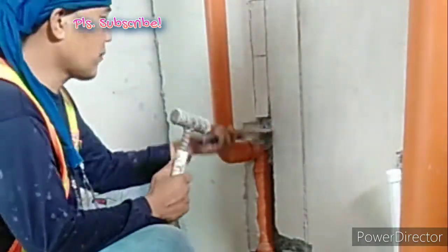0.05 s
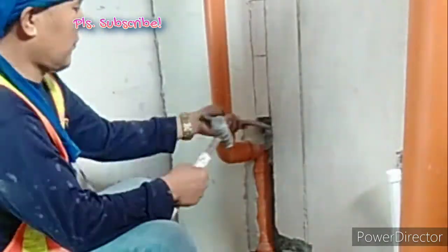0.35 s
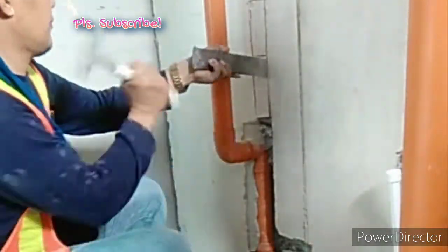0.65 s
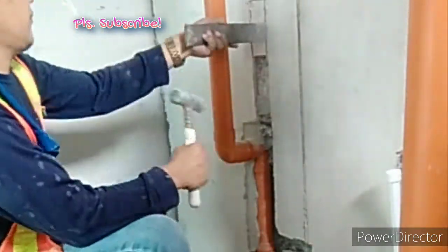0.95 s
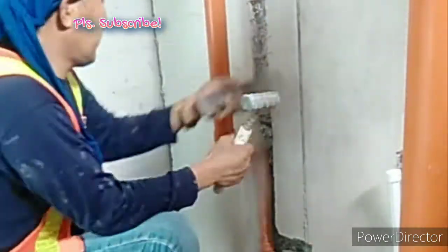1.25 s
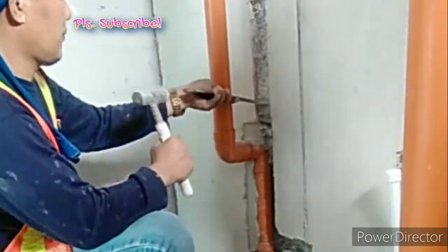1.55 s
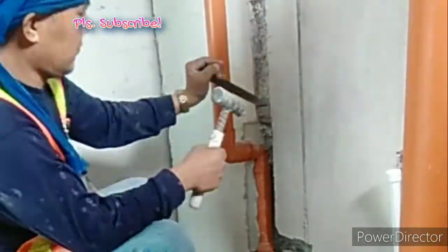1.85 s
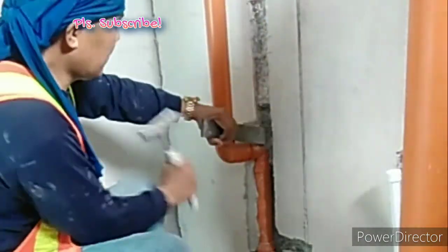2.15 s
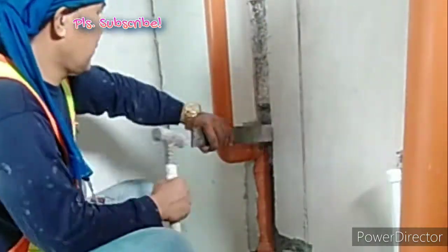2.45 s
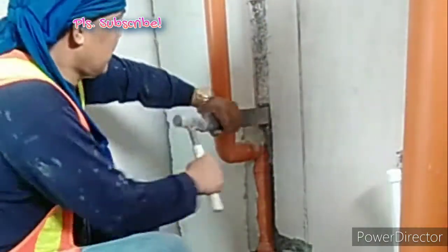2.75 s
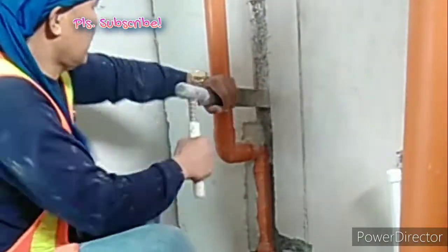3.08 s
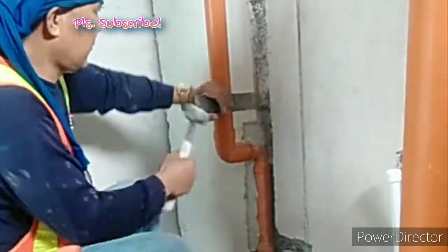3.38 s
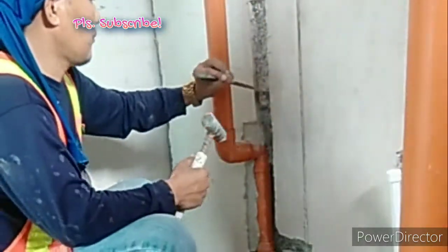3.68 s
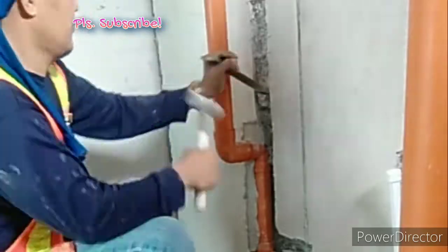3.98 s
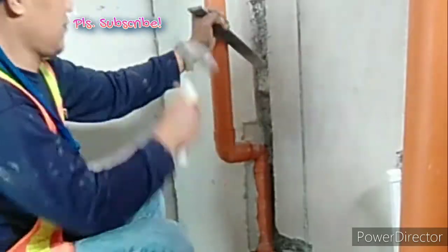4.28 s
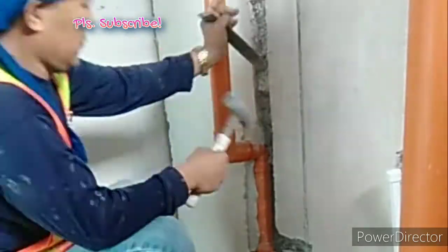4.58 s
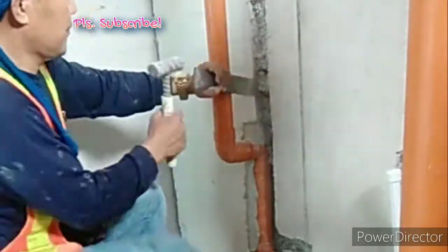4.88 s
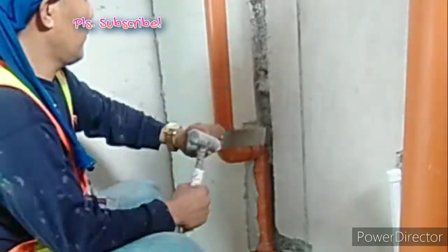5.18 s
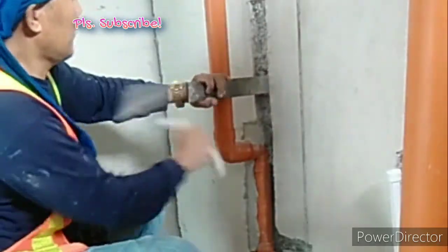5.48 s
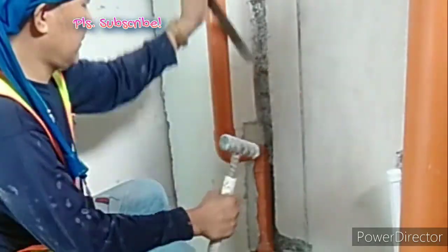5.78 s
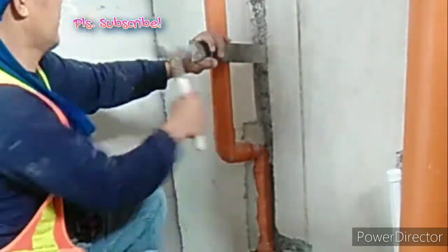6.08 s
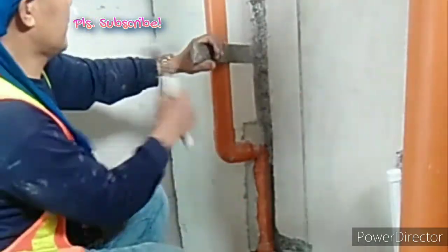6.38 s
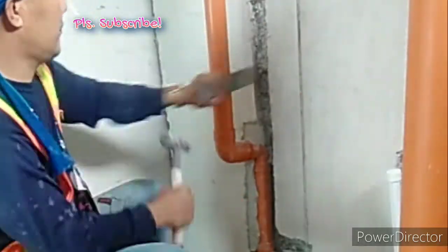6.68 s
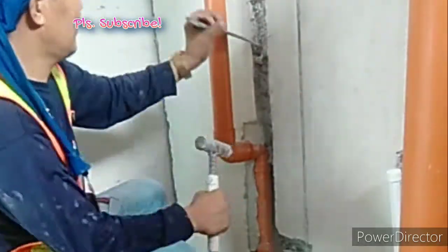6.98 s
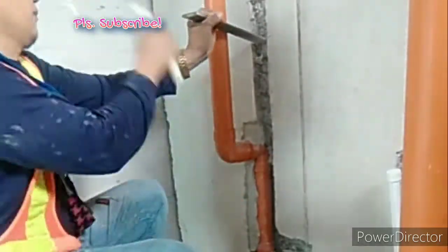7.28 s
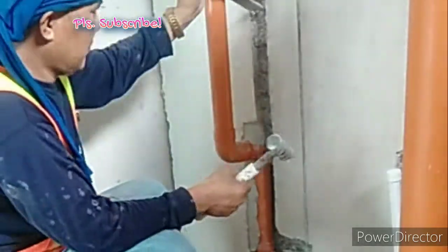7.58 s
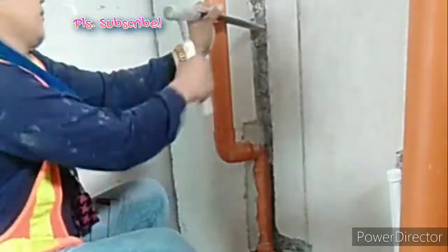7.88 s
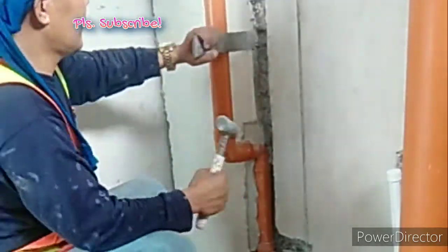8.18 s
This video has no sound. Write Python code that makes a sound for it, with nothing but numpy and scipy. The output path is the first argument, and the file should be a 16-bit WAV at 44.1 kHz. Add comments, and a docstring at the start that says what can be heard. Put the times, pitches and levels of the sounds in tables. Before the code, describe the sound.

A hammer drives a flat steel chisel into a concrete wall in quick bursts of two to six blows, each a hard crack with a short metallic ring. Between bursts the blade knocks and scrapes in the groove, chips tick down and sand trickles. Near the end the scraping increases and the edge squeaks faintly. The microphone is close, in a small bare room.

```python
"""A small bare room, heard from one close microphone: a hammer drives a flat steel chisel into concrete.
The blows come in bursts of two to six, each a hard crack, a ring of chisel and room, and a clatter.
Between bursts come blade knocks and short rasps: scrapes, crumbling concrete, a sleeve's rustle.
Chips tick, sliding blade and trickling sand hiss, and late on the edge squeaks, over faint room tone.
A noise suppressor dries the tails, and the loudest peaks are softly rounded."""
import sys
import numpy as np
from scipy import signal
from scipy.fft import rfft, irfft, next_fast_len
from scipy.io import wavfile
from scipy.ndimage import uniform_filter1d

SR = 44100
rng = np.random.default_rng(int(sys.argv[2]) if len(sys.argv) > 2 else 0)


def store_pcm(level_fs):
    """Save levels as 16-bit WAV."""
    pcm = np.round(np.clip(level_fs, -1, 1) * 32767).astype(np.int16)
    wavfile.write(sys.argv[1], SR, np.atleast_2d(pcm).T)


N = 367786
TIME = np.arange(N) / SR
SINCE_HIT = np.arange(SR // 2) / SR

# the building's steady rush: (frequency [Hz], level [dB])
ROOM_TONE_EQ = [(30, -17.5), (120, -7.5), (250, -32), (460, 9.5), (700, -11.5), (1100, 3.5), (2000, -4.5),
                (4000, -8), (8000, -18), (15500, -28)]
# how long the room holds each pitch: (frequency [Hz], base t60 [s])
ROOM_DECAY = [(100, 0.44), (500, 0.78), (1000, 0.29), (2500, 0.22), (5000, 0.19), (9000, 0.17),
              (15000, 0.2)]
# gritty hiss of sliding blade and trickling sand: (start [s], length [s], relative level [dB])
HISSES = [(0, 0.039, -43), (.82, 0.096, -37.5), (1.22, 0.47, -42.5), (1.8, 0.11, -30.5), (1.98, 0.3, -41.5),
          (2.22, 0.35, -36.5), (4.07, 0.072, -29.5), (5.7, 0.097, -29.5), (7.64, 0.051, -36),
          (8.05, 0.1, -28), (8.16, 0.14, -36.5)]
# the blade knocks in the groove: (time [s], strength [dB], knock boost [dB], crunch boost [dB])
KNOCKS = [(0.016, -40, 8, 5), (0.058, -39.5, 10.5, 11), (0.124, -41, 16, 10.5), (0.541, -32, -4.5, -2.5),
          (0.944, -40, 6, -14.5), (1.271, -31.5, 18.5, 20), (1.494, -43, 19.5, 14.5),
          (1.547, -40.5, 7.5, 9.5), (1.571, -36, 10, 5), (1.639, -42.5, 5.5, 8), (1.957, -38.5, 9, 21),
          (2.107, -31.5, 12.5, 21.5), (2.145, -32.5, 12, 14), (2.53, -32.5, 3.5, 8), (2.542, -32.5, 4, 9),
          (2.73, -34, 15.5, 0), (2.923, -33.5, -1.5, 5.5), (3.243, -20, -1, 9.5), (3.654, -40, 10.5, -13.5),
          (4.218, -25.5, 0.5, -6.5), (4.263, -34, 0, -9), (4.288, -42, 10, -27), (4.312, -42, -0.5, -16.5),
          (4.351, -34.5, 3, 7), (4.378, -46, 14.5, 10.5), (4.894, -40.5, -5, 6), (4.953, -42, 1.5, -3.5),
          (4.991, -26.5, -6, 19.5), (5.759, -30, 11.5, 25), (5.86, -37, 8, 13.5), (6.356, -36.5, 5, -14),
          (7.073, -26.5, 2.5, 12.5), (7.133, -25.5, 0, 6), (7.164, -30, -3, -23), (7.577, -33, -7, 0),
          (7.657, -29.5, -13, -15), (7.69, -33, 7, 8.5), (7.743, -39.5, 13.5, 8.5),
          (7.775, -28.5, -16.5, -24.5), (8.2137, -18, -6.5, 9.5)]
# ringing resonances of chisel and room together: (frequency [Hz], level [dB], base t60 [s])
RESONANCES = [(210, -24, .35), (347, -26, .3), (557, -12.5, .48), (589, -8.5, .44), (691, -16, .25),
              (818, -2.5, .23), (896, -12, .22), (1049, -12, .27), (1170, -9, .27), (1254, -10, .2),
              (1495, -7, .2), (1536, 3.5, .19), (1565, 2, .17), (1604, -3, .22), (1741, -10, .24),
              (1894, -7, .24), (1972, -6, .25), (2096, -10, .24), (2250, -5, .27), (2349, -4, .27),
              (2497, -1, .24), (2543, 1, .24), (2629, -11, .25), (2842, -8, .24), (3048, -6, .23),
              (3251, -9, .23), (4190, -15, .22), (5420, -9, .15), (9130, -21, .16), (11550, -21, .15)]
# dense clatter of steel on concrete: (frequency [Hz], level [dB])
CLATTER_EQ = [(30, -16.5), (60, -22.5), (150, -25.5), (210, -17.5), (300, -16), (480, -13.5), (700, -9.5),
              (1050, 3.5), (2300, 5.5), (3400, 3.5), (4500, -2), (7000, -8.5), (11500, -13.5),
              (15500, -19.5)]
# hammer blows, band by band: (time [s], knock [dB], clang [dB], ring [dB], bite [dB], crunch [dB])
BLOWS = [(0.2616, -28.5, -33.5, -28.5, -34.5, -29.5), (0.3101, -24.5, -29.5, -27, -31.5, -25),
         (0.3581, -26, -22, -26, -29, -26.5), (0.695, -24.5, -25.5, -20, -29.5, -33.5),
         (0.7408, -31.5, -26.5, -17.5, -28.5, -33), (0.78, -30, -29, -18, -27.5, -34),
         (1.087, -26.5, -20.5, -19.5, -31, -36), (1.1332, -32, -24, -18.5, -31.5, -35),
         (1.1724, -28, -27, -20.5, -26, -33.5), (1.6821, -28.5, -24, -25.5, -34, -28.5),
         (1.738, -29, -21.5, -21.5, -31.5, -28), (1.7909, -28.5, -20.5, -24, -29.5, -28),
         (1.8426, -27, -19.5, -27.5, -27, -28), (2.1991, -29.5, -22.5, -25.5, -26.5, -29.5),
         (2.2321, -28, -20, -28, -25.5, -26.5), (2.3735, -24.5, -29.5, -27.5, -33, -35.5),
         (2.41, -29.5, -22, -24, -25.5, -30), (2.586, -28, -25, -23.5, -32.5, -30.5),
         (2.624, -27.5, -23, -23, -27.5, -31), (2.7846, -27, -24.5, -25.5, -33.5, -36),
         (2.8176, -29.5, -23, -21.5, -28, -30), (3.0265, -30.5, -22, -20, -30, -31),
         (3.066, -22.5, -25, -25.5, -27, -28.5), (3.1043, -29.5, -23.5, -25, -27.5, -30),
         (3.1367, -24.5, -30, -24, -25.5, -28.5), (3.3547, -27.5, -20.5, -23.5, -32.5, -31),
         (3.3982, -24, -28.5, -19.5, -25, -29.5), (3.4353, -27.5, -25, -19, -26, -31),
         (3.8413, -26, -21.5, -22, -31.5, -32), (3.8996, -30.5, -21.5, -20, -31.5, -29),
         (3.957, -23.5, -24, -23.5, -33, -28), (4.0121, -30.5, -21.5, -19, -30.5, -27),
         (4.4142, -30, -20, -24.5, -29.5, -30), (4.484, -29.5, -22, -19, -30, -27),
         (4.546, -27.5, -24.5, -17.5, -29, -30.5), (4.603, -25, -26.5, -25.5, -24, -25),
         (5.053, -30.5, -22.5, -21, -34.5, -32.5), (5.101, -30.5, -21, -19, -28, -32.5),
         (5.1433, -30, -26, -19, -28.5, -32.5), (5.4779, -24, -41, -22.5, -34, -30.5),
         (5.519, -27.5, -18.5, -24.5, -29.5, -32), (5.5606, -28.5, -20, -23.5, -30, -31.5),
         (5.6027, -29, -26, -19, -30.5, -29), (5.6429, -29, -25.5, -17.5, -28, -33.5),
         (5.6809, -26, -25, -21.5, -24.5, -30), (6.061, -26, -21.5, -22, -29, -29),
         (6.1077, -28.5, -23, -18, -28.5, -29), (6.149, -27.5, -24, -20, -24, -30),
         (6.1872, -25.5, -25, -17.5, -27, -31), (6.3959, -24.5, -31, -19, -29.5, -31),
         (6.4435, -33.5, -22.5, -19, -29, -30.5), (6.4843, -26, -28.5, -19, -27, -30.5),
         (6.6662, -28.5, -21, -22.5, -30.5, -30.5), (6.7099, -27.5, -19, -22, -28, -31.5),
         (6.8948, -26, -21.5, -23, -30, -32.5), (6.9367, -30, -22.5, -19.5, -30.5, -32.5),
         (7.2782, -36.5, -27, -20.5, -32, -31.5), (7.3393, -29, -24.5, -19.5, -30, -28.5),
         (7.392, -31, -22, -19, -29, -28.5), (7.888, -29, -19.5, -22, -31, -29),
         (7.9534, -28.5, -18, -22, -28.5, -30), (8.0151, -29, -25, -17.5, -27, -27.5)]
# edges of those five bands, from knock up to crunch: (frequency [Hz])
BAND_EDGES = [700, 1380, 1730, 3250, 6750, 15000]
# the crack of steel on steel: (frequency [Hz], level [dB])
CRACK_EQ = [(100, -27), (1000, -23), (2500, 1.5), (5500, 7.5), (7500, 4), (10500, 6.5), (15500, 1)]
# chips of concrete land: (time [s], level [dB])
CHIPS = [(0.478, -40.5), (0.9022, -36), (1.0093, -36.5), (1.328, -35), (1.401, -42.5), (1.447, -47),
         (1.622, -48), (2.021, -39.5), (2.075, -39), (4.269, -49), (4.729, -45.5), (4.785, -46.5),
         (4.822, -47), (7.0285, -45), (7.54, -39.5), (7.564, -36)]
# the tick of a landing chip: (frequency [Hz], level [dB])
CHIP_EQ = [(100, -18.5), (600, -2.5), (1500, 6.5), (4000, 4), (7000, 5.5), (10500, 3), (15500, -8.5)]
# blade scrapes, crumbling concrete and a sleeve's rustle: (start [s], length [s], level [dB])
RASPS = [(.86, 0.04, -39), (2.15, 0.031, -47), (2.755, 0.04, -46.5), (4.115, 0.023, -31),
         (5.455, 0.014, -40.5), (6.56, 0.096, -38), (6.73, 0.127, -34.5), (6.865, 0.143, -34.5),
         (7.05, 0.14, -36), (7.48, 0.036, -47), (7.65, 0.14, -35.5), (7.81, 0.039, -37.5),
         (8.08, 0.089, -36.5), (8.24, 0.12, -34.5)]
# the edge skids: (start [s], length [s], pitch [Hz], level [dB], jitter [share of pitch])
SQUEAKS = [(7.632, .1, 6650, -47, 0.0084), (8.057, 0.27, 3900, -45.5, 0.038),
           (8.127, 0.206, 6360, -48.5, 0.04)]
# the colours of the hiss and the rasps: (frequency [Hz], level [dB])
HISS_EQ = [(1000, -9.5), (2500, 6.5), (4000, 1), (7000, 1), (10000, 1.5), (15000, -3)]
RASP_EQ = [(200, -15), (600, -6), (1050, 11.5), (1550, 4.5), (2400, 4), (3100, -4.5), (4200, -1.5),
           (12000, -36)]


def amp(db):
    """Decibels to gain."""
    return 10 ** (np.asarray(db) / 20)


def curve_at(points, hz):
    """Reads a (frequency [Hz], value) curve on a log-frequency axis."""
    freqs, values = np.transpose(points)
    return np.interp(np.log(hz + 1), np.log(freqs + 1), values)


def unit_rms(x, size=None):
    """Scales to rms 1 over the first size samples."""
    return x / np.sqrt(np.mean(x[:size] ** 2) + 1e-20)


def decay(t, t60):
    """An envelope that falls 60 dB in t60 seconds."""
    return np.exp(-np.log(1000) * t / t60)


def place(mix, start, sound):
    """Lays a sound into the mix at start seconds."""
    part = mix[max(round(start * SR), 0):][:len(sound)]
    part += sound[:len(part)]


def eq(x, curve):
    """Minimum-phase EQ along a (frequency [Hz], level [dB]) curve: no ringing ahead of a hit."""
    size = next_fast_len(len(x) + SR // 10)
    log_gain = np.log(amp(curve_at(curve, abs(np.fft.fftfreq(size, 1 / SR)))))
    response = np.exp(np.conj(signal.hilbert(log_gain)))[:size // 2 + 1]
    return irfft(rfft(x, size) * response, size)[:len(x)]


def fader(cues, rise_s, sag_db_per_s, release_s):
    """Gain over time: each cue rises, sags while it lasts, then falls 60 dB in release_s."""
    gain = np.zeros(N)
    for start, length, db in cues:
        t = np.maximum(TIME - start, 0)
        release = decay(np.maximum(t - length, 0), release_s)
        gain += np.minimum(t / rise_s, 1) * amp(db - sag_db_per_s * t) * release
    return gain


def room_tone():
    """The even rush of the building, a bed under everything."""
    return amp(-51) * unit_rms(eq(rng.standard_normal(N), ROOM_TONE_EQ))


def echoes(sustain):
    """A dense wash of reflections; sustain scales the room's decay time in every band."""
    hz, t, bands = signal.stft(rng.standard_normal(len(SINCE_HIT)), SR, nperseg=256)
    bands = bands * decay(t, sustain * curve_at(ROOM_DECAY, hz)[:, None])
    return signal.istft(bands, SR, nperseg=256)[1][:len(SINCE_HIT)]


def grain_gains(count, spread_db):
    """Random grain strengths, most small and a few large."""
    return amp(spread_db * np.minimum(rng.exponential(1, count), 3))


def gritty_hiss(ticks_per_s=200):
    """The blade slides across the wall and sand trickles: tiny pitched ticks, the room's wash behind."""
    grains, t = np.zeros(N), SINCE_HIT[:SR // 100]
    for hz in np.geomspace(2500, 15000, 44):
        impulses = np.zeros(N)
        at = rng.integers(0, N, round(ticks_per_s * N / SR))  # at this pitch
        impulses[at] = grain_gains(len(at), spread_db=3.2)
        tick = t * np.exp(-t / .0011) * np.sin(2 * np.pi * hz * t)
        grains += signal.oaconvolve(impulses, tick)[:N]
    wash = signal.oaconvolve(grains, echoes(sustain=.62))[:N]
    hiss = eq(unit_rms(grains) + amp(-3) * unit_rms(wash), HISS_EQ)
    return amp(-8.5) * unit_rms(hiss) * fader(HISSES, rise_s=.0052, sag_db_per_s=4, release_s=.06)


def random_phases():
    """A starting phase for each resonance."""
    return 2 * np.pi * rng.random((len(RESONANCES), 1))


def chisel_and_room(phases, sustain, spread_db, detune):
    """Chisel and room ring together; the resonances shift from hit to hit, the highest most."""
    hz, db, t60 = np.transpose(RESONANCES)[:, :, None]
    strength, shift = rng.standard_normal((2, len(RESONANCES), 1))
    t = SINCE_HIT[:SR // 3]
    pitch = hz * (1 + detune * (1 + (hz / 4000) ** 2) * shift)
    attack = 1 - np.exp(-t / np.where(hz < 650, .012, .0006))  # the room's low ones bloom late
    envelopes = amp(db + spread_db * strength) * attack * decay(t, t60 * sustain)
    ring = (envelopes * np.sin(2 * np.pi * pitch * t + phases)).sum(0)
    return np.pad(ring, (0, len(SINCE_HIT) - len(t)))


def concrete(x, curve, spread_db):
    """Colours x with curve, then with the chance treble resonances of one piece of concrete."""
    hz = np.geomspace(4200, 15000, 26)
    db = spread_db * np.r_[0, rng.standard_normal(len(hz) - 1)]
    return eq(eq(x, curve), np.c_[hz, db])


def blade_knocks():
    """Light touches of the hand-damped blade on the wall: a choked ring in a short clatter."""
    out, head = np.zeros(N), 660  # samples that set the balance
    for start, db, knock_db, crunch_db in KNOCKS:
        ring = unit_rms(chisel_and_room(random_phases(), sustain=.22, spread_db=3, detune=.04), head)
        clatter = unit_rms(concrete(echoes(sustain=.45), CLATTER_EQ, spread_db=4), head)
        touch = unit_rms(clatter + amp(-3) * ring, head) * (1 - np.exp(-SINCE_HIT / .0017))
        lows_and_mids = [(500, .5 * knock_db), (1100, knock_db), (2000, 0), (2700, .042)]
        highs = [(3600, .5 * crunch_db - 8), (5500, crunch_db - 12.5), (8000, crunch_db - 11.5)]
        place(out, start, amp(db) * eq(touch, lows_and_mids + highs))
    return out


def voice_blow(blow, levels_db):
    """EQs a blow so that each of its five bands starts at the given level."""
    hz, power = signal.periodogram(blow[:1400], SR, nfft=len(blow), detrend=False)
    curve = [(600, -5 + .5 * np.mean(levels_db))]  # the bass follows the blow's strength only by half
    for low, high, db in zip(BAND_EDGES, BAND_EDGES[1:], levels_db):
        band_db = 10 * np.log10(power[(hz > low) & (hz < high)].sum() * hz[1])
        curve += [(corner, db - band_db) for corner in np.geomspace(low, high, 7)[[1, -2]]]
    return eq(blow, curve)


def hammer_blows():
    """Steel cracks on steel, chisel and room ring, and a clatter returns by much the same echoes."""
    out, head = np.zeros(N), 1320  # samples that set the balance
    phases, same_echoes = random_phases(), echoes(sustain=.94)
    build_up = 1 - .35 * np.exp(-SINCE_HIT / .0022)  # the body fills in as the first echoes gather
    for start, *levels_db in BLOWS:
        hit_phases = phases + .4 * rng.standard_normal(phases.shape)
        ring = chisel_and_room(hit_phases, sustain=.9, spread_db=2, detune=.0022)
        clatter = concrete(same_echoes + .5 * echoes(sustain=1.06), CLATTER_EQ, spread_db=3.5)
        crack = eq(rng.standard_normal(len(SINCE_HIT)) * decay(SINCE_HIT, t60=.0071), CRACK_EQ)
        body = (unit_rms(ring, head) + amp(-2) * unit_rms(clatter, head)) * build_up
        blow = unit_rms(body, head) + amp(-16.5) * unit_rms(crack, head)
        place(out, start, voice_blow(blow, levels_db))
    return out


def falling_chips():
    """Single chips of concrete tick on the floor, each with its own treble colour."""
    out = np.zeros(N)
    attack = 1 - np.exp(-SINCE_HIT / .00059)
    for start, db in CHIPS:
        tick = concrete(echoes(sustain=.24), CHIP_EQ, spread_db=5.5) * attack
        place(out, start, amp(db) * unit_rms(tick, size=440))
    return out


def short_rasps(catches_per_s=520):
    """Blade scrapes, crumbling concrete and a sleeve's rustle: tiny catches excite a choked ring."""
    ring = chisel_and_room(random_phases(), sustain=.1, spread_db=1, detune=.01)
    response = unit_rms(ring) + unit_rms(echoes(sustain=.2))
    catches = (rng.random(N) < catches_per_s / SR) * rng.choice([-1, 1], N)
    clicks = catches * grain_gains(N, spread_db=3)
    rasp = eq(signal.oaconvolve(clicks, response)[:N], RASP_EQ)
    return unit_rms(rasp) * fader(RASPS, rise_s=.012, sag_db_per_s=22.5, release_s=.025)


def edge_squeaks():
    """Brief, rough whistles as the edge skids."""
    out = np.zeros(N)
    for start, length, hz, db, jitter in SQUEAKS:
        size = round(length * SR)
        wobble = unit_rms(uniform_filter1d(rng.standard_normal(len(SINCE_HIT)), size=90))[:size]
        whistle = np.sin(2 * np.pi * np.cumsum(hz * (1 + jitter * wobble)) / SR)
        place(out, start, amp(db) * unit_rms(whistle * signal.windows.tukey(size, .5)))
    return out


def suppress_noise(x, depth_db, margin_db):
    """Spectral gate: bins that sink near their own floor are ducked, which cuts tails short."""
    bins = signal.stft(x, SR, nperseg=512, noverlap=384)[2]
    power = uniform_filter1d(abs(bins) ** 2, size=5, axis=1)  # smooth across frequency
    power = uniform_filter1d(power, size=3, axis=2)  # then across time
    level_db = 10 * np.log10(abs(power) + 1e-20)
    floor_db = np.percentile(level_db, 8, axis=2, keepdims=True)
    shut = .5 - .5 * np.tanh((level_db - floor_db - margin_db) / 3)
    return signal.istft(bins * amp(-depth_db * shut), SR, nperseg=512, noverlap=384)[1][:, :N]


def scene():
    """The mono mix: hits up front, small textures and room tone beneath."""
    hits = hammer_blows() + blade_knocks()
    return (hits + short_rasps() + edge_squeaks() + falling_chips() + gritty_hiss() + room_tone())[None]


def record(dry):
    """The master chain: noise suppressor, soft clip, then a steep high cut."""
    ceiling, cutoff_hz = .68, 15570
    gated = suppress_noise(dry, depth_db=10, margin_db=11.5)
    rounded = gated / (1 + (gated / ceiling) ** 4) ** .25
    high_cut = signal.firwin(511, cutoff_hz, window=("kaiser", 9), fs=SR)
    return signal.oaconvolve(rounded, high_cut[None], "same")


dry = scene()
out = record(dry)
store_pcm(out)
```